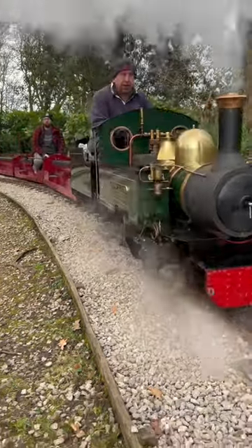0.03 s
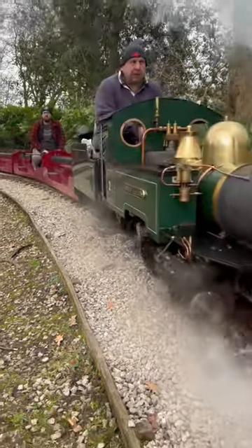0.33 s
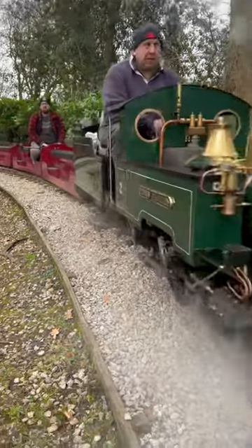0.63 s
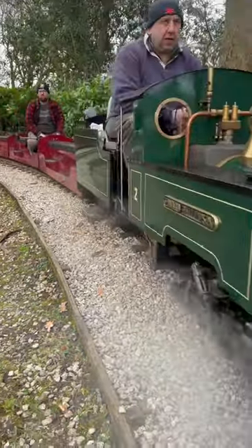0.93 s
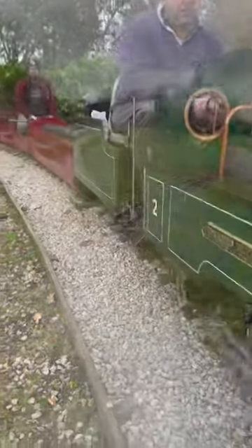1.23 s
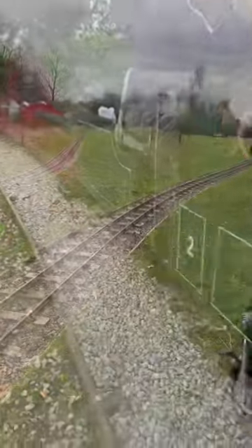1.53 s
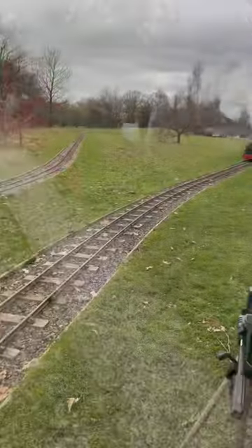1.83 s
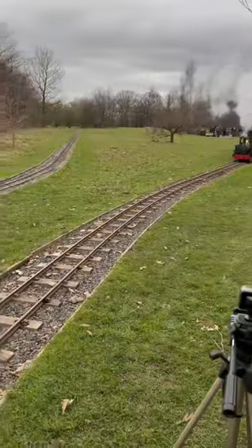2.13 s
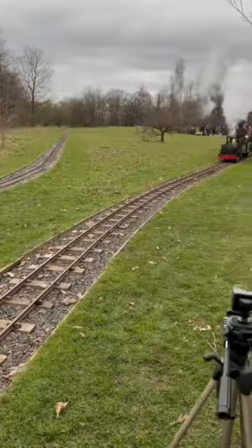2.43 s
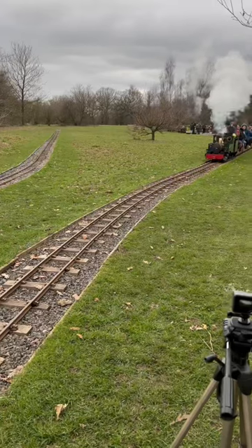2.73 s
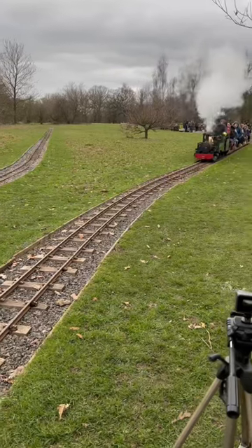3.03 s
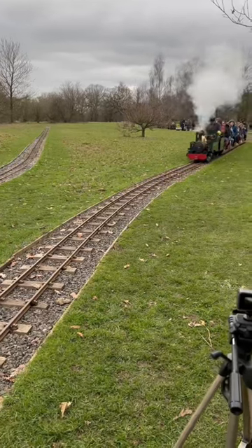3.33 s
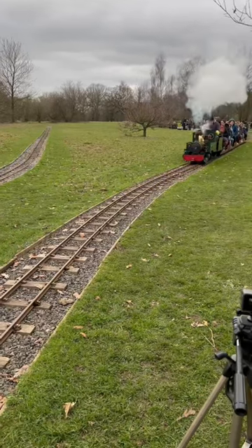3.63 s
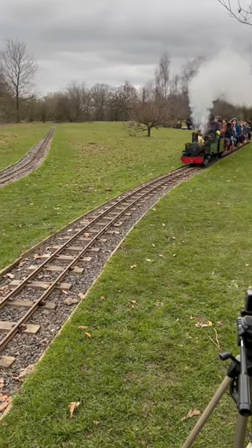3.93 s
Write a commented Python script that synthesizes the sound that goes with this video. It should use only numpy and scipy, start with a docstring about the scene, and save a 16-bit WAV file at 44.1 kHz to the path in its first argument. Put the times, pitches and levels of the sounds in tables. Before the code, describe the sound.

Small steam engine rumbling and hissing past, followed by rapid, regular chuffing in the distance.

```python
"""Soft hollow exhaust beats, rumbling wheels, clanking rods and hissing cylinders: a miniature steam
locomotive rolls past at arm's length. Each beat rings the chimney and pushes out a low thump of air.
This fades into the engine farther off across a field, working hard at twice the pace: four sharp
chuffs to each turn of the wheels, slowly drawing nearer, with a few soft gusts of wind."""
import sys
import numpy as np
from scipy import signal
from scipy.fft import rfft, irfft
from scipy.io import wavfile
from scipy.ndimage import uniform_filter1d

SR = 44100
rng = np.random.default_rng(int(sys.argv[2]) if len(sys.argv) > 2 else 0)


def to_wav(s):
    """Save 16-bit WAV."""
    ch = np.atleast_2d(s).T  # columns
    pcm = np.round(np.clip(ch, -1, 1) * 32767)  # PCM
    wavfile.write(sys.argv[1], SR, pcm.astype(np.int16))


N = 176400

# stereo images, treble and close pass: freq_hz, left_minus_right_db, coherence, left_lead_rad
TREBLE_IMAGE = [(7300,0,.7,-1.2),(8200,0,.96,0),(9200,0,.8,1.4),(9900,0,.99,2.9),(10700,0,.99,3.4),(11400,0,.8,5),(12400,0,.96,6.3),(13500,0,.8,7.6),(14400,0,.99,9.2),(15750,0,.99,9.7)]
NEAR_IMAGE = [(60,0,.99,0),(130,.3,.99,0),(250,1.6,.98,-.2),(480,2.4,.9,-.7),(690,.3,.87,-1.2),(1100,0,.8,-.5),(2000,-2,.85,.2),(2400,-4,.3,-1.5),(2850,-1,.75,-2.4),(3800,-4,.15,-2.2),(4600,-3.5,.55,-2.3),(5150,-5,.6,-4.3),(5800,0,.98,-3.3),(6300,0,.98,-3)] + TREBLE_IMAGE
# steam jet spectrum: freq_hz, level_db
STEAM_SPECTRUM = [(500,12),(1500,13),(2200,2),(2800,7.5),(3500,5.5),(4600,7),(5300,4.5),(6000,13),(7300,6),(8600,1.5),(9700,2),(10600,1),(12000,7.5),(13500,8),(14500,3),(15700,-8),(16200,-30)]


def near_exhaust():
    """Each beat rings the chimney; a low push of air follows."""
    # exhaust beats: start_s, note_db, thump_db
    beats = [(0.004,-16.5,-14),(0.117,-11.5,-10.5),(0.265,-18.5,-18),(0.42,-22,-33),(0.546,-19.5,-14),(0.666,-13.5,-13),(0.788,-10.5,-11.5),(0.939,-9,-17),(1.075,-17.5,-12),(1.194,-11.5,-12),(1.317,-19.5,-12.5),(1.462,-19.5,-16),(1.603,-17.5,-20)]
    # chimney and thump spectra: freq_hz, level_db
    note_spectrum = [(100,-32),(200,-7),(270,-6),(370,-29),(470,-13),(590,3),(648,9.5),(682,9.5),(745,-8),(1000,-12),(1300,-15.5),(2200,-25),(5000,-27.5),(15000,-60)]
    thump_spectrum = [(20,-34),(38,-32),(55,-5),(85,6),(125,-14.5),(200,-6),(400,-76)]
    note = steadied(turbulence(note_spectrum, NEAR_IMAGE, rough_db=6), window_s=0.0063)
    note *= puffs([(s, db) for s, db, _ in beats], attack_s=0.0036, hold_s=0.01, t60_s=0.29, accent=0.62)
    thump = steadied(turbulence(thump_spectrum, NEAR_IMAGE), window_s=0.075)
    thump *= puffs([(s, db) for s, _, db in beats],
                   delay_s=0.0028, attack_s=0.0087, hold_s=0.042, t60_s=0.15)
    return from_db(-6.5) * note + from_db(-13) * thump


def far_engine():
    """Each chuff is a hollow blast, hiss, bark and thump; the chimney's ring grows as the engine nears."""
    # chuffs: start_s, level_db
    beats = [(1.693, -25.5), (1.7574, -28), (1.8244, -29.5), (1.905, -25.5), (1.9804, -22.5),
             (2.046, -23.5), (2.1156, -25.5), (2.1933, -24.5), (2.2654, -23), (2.3314, -22.5), (2.399, -26),
             (2.482, -23), (2.5526, -23), (2.6184, -22.5), (2.682, -23.5), (2.7634, -23), (2.8358, -21.5),
             (2.9027, -21.5), (2.9667, -23), (3.0458, -22), (3.1208, -20), (3.1864, -22), (3.252, -23),
             (3.3277, -21.5), (3.4007, -21), (3.4656, -21.5), (3.53, -23.5), (3.6078, -21), (3.681, -21.5),
             (3.7435, -21.5), (3.8064, -21.5), (3.8844, -22), (3.957, -20)]
    # spectra of the chuff's parts and the train's drone: freq_hz, level_db
    blast_spectrum = [(600,-19),(1000,-2),(1150,-4),(1230,-15),(1470,-1.5),(1690,-6.5),(1880,2.5),(2400,1),(2900,0.5),(3250,-3),(3550,-16),(4250,-12.5),(4650,-3.5),(5100,-10),(6200,-44),(9000,-35)]
    hiss_spectrum = [(1500,-29),(2800,4),(4500,-0.5),(5500,3),(6600,5.5),(7800,-3),(9200,-3),(11200,-5),(13500,-6),(15600,-9),(16200,-33)]
    ring_spectrum = [(650,-34),(780,0),(880,-9),(1050,-14),(1250,-11),(1380,-2.5),(1465,4.5),(1560,-6.5),(1900,-3),(2600,-25),(3150,-33),(3550,-4.5),(3850,-9),(4250,-8.5),(4700,-33),(6000,-28)]
    bark_spectrum = [(130,-21),(210,4.5),(290,0),(380,-5.5),(490,-0.5),(580,-4),(660,10),(790,6),(900,-3.5),(1060,-10),(1400,-45),(3000,-56)]
    thump_spectrum = [(25,-25),(60,2),(100,8),(125,4),(165,-4.5),(205,2.5),(260,-39.5),(500,-50)]
    drone_spectrum = [(20,-28),(45,-42),(85,-3.5),(120,-5),(160,-9),(205,2),(270,-20),(480,-9.5),(700,-17),(1100,-22),(2200,-27.5),(5000,-41),(9000,-45),(15000,-66)]
    # swell of chimney ring and drone: time_s, level_db
    ring_swell = [(1.7,-26),(2.6,-15.5),(3.1,-15),(3.5,-11.5),(4,-12)]
    drone_swell = [(0,-72),(1.2,-57),(1.7,-32.5),(2.2,-35.5),(3,-36),(4,-31.5)]
    # distant stereo image: freq_hz, left_minus_right_db, coherence, left_lead_rad
    image = [(60,1.5,.65,0),(130,1.5,.82,0),(250,2,.88,-.2),(700,3.3,.97,-1.1),(1300,-2,.85,-1.2),(1600,-6,.88,-.1),(2050,-5,.85,0),(2450,-5.5,.8,2.3),(2900,-6,.83,1.4),(3500,-3.5,.82,1),(4300,-6,.6,-1.4),(5100,-8,.68,-4.2),(5700,0,.98,-3.3),(6400,0,.98,-3)] + TREBLE_IMAGE
    blast = flicker(turbulence(blast_spectrum, image, rough_db=1.8), depth_db=2)
    blast = steadied(blast, window_s=0.029)
    blast *= puffs(beats, delay_s=-0.003, attack_s=0.007, hold_s=0.011, t60_s=0.2, accent=0.5)
    hiss = flicker(turbulence(hiss_spectrum, image, rough_db=-1), depth_db=3)
    hiss *= puffs(beats, delay_s=-0.0022, attack_s=0.0062, hold_s=0.013, t60_s=0.21)
    ring = steadied(turbulence(ring_spectrum, image), window_s=0.014)
    ring *= puffs(beats, delay_s=-0.0037, attack_s=0.0052, hold_s=0.024, t60_s=0.18, accent=1.85)
    ring *= gain_curve(ring_swell)
    bark = steadied(turbulence(bark_spectrum, image, rough_db=3), window_s=0.02)
    bark *= puffs(beats, delay_s=-0.0022, attack_s=0.015, hold_s=0.014, t60_s=0.2, accent=0.82)
    thump = steadied(turbulence(thump_spectrum, image), window_s=0.027)
    thump *= puffs(beats, delay_s=0.001, attack_s=0.0077, hold_s=0.022, t60_s=0.48, accent=0.95)
    drone = gain_curve(drone_swell) * steadied(turbulence(drone_spectrum, image), window_s=0.032)
    echoing = field_echoes(early_echoes(from_db(-10.5) * blast + from_db(-16) * hiss))
    return echoing + ring + from_db(-7.5) * bark + from_db(-8) * thump + drone


def wheels():
    """Wheels rumble on the rails close by."""
    # rolling level: time_s, level_db
    rolling = [(0,-26),(.38,-22),(.5,-22),(.64,-23.5),(.85,-22.5),(1.0,-19.5),(1.12,-21.5),(1.18,-23),(1.28,-27),(1.38,-22.5),(1.5,-24.5),(1.75,-33),(2.0,-44),(2.2,-91.5)]
    # rumble spectrum: freq_hz, level_db
    spectrum = [(20,-42),(50,-1.5),(85,4),(130,0.5),(180,2.5),(255,3),(330,-3.5),(390,-3),(470,-0.5),(570,-2.5),(670,0),(780,-5),(1000,-11),(1400,-22.5),(2500,-28),(6000,-57)]
    gain = gain_curve(rolling) * from_db(-0.5 + 0.13 * drift(6))
    return gain * flicker(turbulence(spectrum, NEAR_IMAGE, rough_db=-0.5), depth_db=2)


def rods():
    """Rods and couplings knock, each blow with a crack at its own pitch."""
    # blows: start_s, knock_db, knock_t60_s, crack_db, crack_hz
    clanks = [(0.123,-27,0.075,-30,1600),(.222,-26,0.1,-25.5,1680),(.262,-26,0.03,-32,3600),(.400,-20,0.25,-32,1900),(.430,-24,0.061,-22,1640),(.466,-30,.06,-34,3100),(0.567,-21,0.1,-38,1700),(.670,-23,0.16,-37,1500),
              (0.934,-18.5,.1,-28,1610),(0.966,-19,0.034,-22.5,2450),(.980,-27,0.073,-37,3200),(1.078,-22,.12,-32,1700),(1.104,-24,0.088,-39,2700),(1.197,-23,0.17,-41,1700),(1.393,-22,0.12,-25,1410),(1.455,-20.5,0.47,-36,4100),(1.485,-21,0.067,-22,2870)]
    # knock and crack spectra: freq_hz, level_db
    knock_spectrum = [(200,2),(700,7.5),(1250,11),(1700,5.5),(2200,-9),(2700,4.5),(4000,-10),(6000,-9),(14000,-48)]
    crack_spectrum = [(800,11.5),(1600,-1.5),(2700,3),(3700,1.5),(4600,-1),(6500,-5),(12000,-30)]
    width_octaves = 0.61
    knock_noise = steadied(turbulence(knock_spectrum, NEAR_IMAGE, rough_db=5), window_s=0.0055)
    crack_noise = turbulence(crack_spectrum, NEAR_IMAGE)
    knocks = cracks = 0
    for start_s, knock_db, t60_s, crack_db, crack_hz in clanks:
        blow = puffs([(start_s, knock_db)], delay_s=-0.0025, attack_s=0.0016, hold_s=0.0092, t60_s=t60_s)
        knocks += blow * knock_noise
        edges_hz = crack_hz * 2 ** (np.array([-0.5, 0.5]) * width_octaves)
        band = signal.butter(1, edges_hz, "band", fs=SR, output="sos")
        crack = steadied(signal.sosfilt(band, crack_noise), window_s=0.002)
        cracks += crack * puffs([(start_s, crack_db)], attack_s=0.0012, hold_s=0.0013, t60_s=0.044)
    return from_db(-9.5) * knocks + cracks


def cylinder_steam():
    """Wet steam hisses from the cylinders and spits more at strong flow."""
    # steam flow: time_s, level_db
    flow = [(0,-36),(.05,-36.5),(.11,-41),(.19,-41),(.24,-42),(.39,-43.5),(.45,-35),(.6,-36.5),(.7,-39.5),(.76,-43.5),(.92,-39),(.98,-33),(1.1,-34.5),(1.17,-38.5),(1.32,-42),(1.5,-40.5),(1.79,-49.5)]
    # spit spectrum: freq_hz, level_db
    spit_spectrum = [(500,-33),(1300,-14),(2000,7),(2750,11),(3300,9),(4600,7.5),(5400,-14),(7000,-24)]
    flow_db, = curves(flow)
    fade, = curves([(1.76, 0.99), (1.95, 0.46)])  # time_s, gain
    hiss = flicker(turbulence(STEAM_SPECTRUM, NEAR_IMAGE, rough_db=0.4), depth_db=4, span_frames=5)
    hiss *= from_db(flow_db + 4 + 0.5 * drift(25))
    spit = from_db(1.155 * flow_db + 3) * turbulence(spit_spectrum, NEAR_IMAGE, rough_db=-0.5)
    return fade * (hiss + spit)


def jet_whistle():
    """The steam jet whistles thinly, twice: a gliding narrow band of noise."""
    # whistle: time_s, pitch_hz, level_db
    glide = [(.4,5080,-52),(.46,4890,-39),(.52,4660,-38),(.62,4480,-41.5),(.72,4310,-47),(.8,4300,-60),(.92,4440,-66),(.98,4520,-45),(1.12,4700,-41),(1.3,4720,-85)]
    width_hz = 170
    pitch_hz, level_db = curves(glide)
    phase = 2 * np.pi * np.cumsum(pitch_hz) / SR
    ears = np.array([drift(width_hz) * np.cos(phase) + drift(width_hz) * np.sin(phase) for _ in range(2)])
    return from_db(level_db) * steadied(ears, window_s=0.018) * from_db([[-3], [0]])


def jet_sizzle():
    """A high sizzle of the steam jet peaks as the first whistle ends."""
    # sizzle level: time_s, level_db
    swell = [(.41,-75),(.46,-36),(.52,-42),(.66,-40),(.70,-36),(.745,-31),(.765,-40),(.79,-80)]
    # sizzle spectrum: freq_hz, level_db
    spectrum = [(8500,-25),(10200,-6),(11300,16),(12200,-5),(13000,13),(14200,-4),(16000,-20)]
    return gain_curve(swell) * turbulence(spectrum, NEAR_IMAGE)


def water_spurts():
    """Drops of water burst through the steam jet."""
    # drops: start_s, level_db
    drops = [(.262,-34.5),(.97,-30),(1.0,-42)]
    envelope = puffs(drops, delay_s=-0.0011, attack_s=0.0018, hold_s=0.005, t60_s=0.049)
    return envelope * turbulence(STEAM_SPECTRUM, NEAR_IMAGE)


def body_booms():
    """After the hardest knocks the engine's body booms on a wavering low note."""
    # booms: start_s, level_db, pitch_hz
    booms = [(.468,-26,174.3),(.51,-24.5,226),(.98,-25,249)]
    time_s = np.arange(N) / SR
    out = np.zeros(N)
    for start_s, level_db, pitch_hz in booms:
        tone = np.sqrt(2) * np.sin(2 * np.pi * pitch_hz * time_s + 0.32 * drift(25))
        out += tone * puffs([(start_s, level_db)], attack_s=0.0082, hold_s=0.018, t60_s=0.12)
    return out


def rail_ring():
    """The rail rings on behind the engine in two wavering tones."""
    # rail tones: pitch_hz, level_db
    tones = [(476,-1.5),(530,-6)]
    # ring level: time_s, level_db
    swell = [(0,-42),(1.2,-49),(1.55,-34),(1.8,-36),(2.1,-67),(2.3,-84)]
    ring = np.zeros(N)
    for pitch_hz, level_db in tones:
        phase = 2 * np.pi * pitch_hz * np.arange(N) / SR
        ring += from_db(level_db) * (drift(1.9) * np.cos(phase) + drift(12.5) * np.sin(phase))
    return gain_curve(swell) * ring


def wind():
    """Soft low gusts buffet the listening point in the open field."""
    # gusts: start_s, level_db
    gusts = [(2.36,-34),(3.19,-25.5),(3.42,-23.5)]
    # buffet spectrum: freq_hz, level_db
    spectrum = [(20,-23),(35,-16),(70,13),(110,-5),(200,-10),(400,-55)]
    # stereo image: freq_hz, left_minus_right_db, coherence, left_lead_rad
    image = [(20,2,.5,0),(400,2,.5,0)]
    envelope = puffs(gusts, delay_s=-0.0076, attack_s=0.023, hold_s=0.019, t60_s=0.14)
    return envelope * turbulence(spectrum, image)


def early_echoes(x):
    """Dull echoes off nearby surfaces make the sound hollow."""
    # reflections: delay_s, gain
    echoes = [(.0062,.4),(.0021,.08)]
    cutoff_hz = 4200
    hz = np.arange(N // 2 + 1) * SR / N
    reflected = sum(gain * np.exp(-2j * np.pi * hz * delay_s) for delay_s, gain in echoes)
    return irfft(rfft(x) * (1 + reflected / np.hypot(1, (hz / cutoff_hz) ** 2)), N)


def field_echoes(x):
    """Faint returns from across the field trail into the gaps between chuffs."""
    # returns: delay_s, gain
    echoes = [(.031,0.086),(.047,0.066),(.089,.1)]
    samples = np.arange(N)
    return x + sum(gain * np.array([np.interp(samples - delay_s * SR, samples, ear, left=0) for ear in x])
                   for delay_s, gain in echoes)


def turbulence(spectrum, image, rough_db=0):
    """Sputtering stereo noise with the given spectrum and image; rms 1."""
    hz = np.arange(N // 2 + 1) * SR / N
    white = rng.standard_normal((2, N)) * from_db(rough_db * drift(174))
    common, apart = rfft(white)
    points_hz, levels_db = np.transpose(spectrum)
    colour = from_db(np.interp(np.log(hz + 1), np.log(points_hz), levels_db)) * hz / (hz + 10)
    image_hz, *columns = np.transpose(image)
    pan_db, coherence, lead_rad = [np.interp(hz, image_hz, column) for column in columns]
    ears = []
    for side in (1, -1):
        blend = np.sqrt(1 + coherence) * common + side * np.sqrt(1 - coherence) * apart
        pan = from_db(side * pan_db / 2) / np.sqrt(np.cosh(pan_db * np.log(10) / 20))  # constant power
        ears.append(colour * blend * pan * np.exp(side * 0.5j * lead_rad))
    return unit_rms(irfft(ears, N))


def puffs(beats, attack_s, hold_s, t60_s, delay_s=0, accent=1):
    """Envelope of beats that open, hold and die; accent scales their spread in dB."""
    power = np.zeros(N)
    mean_db = np.mean([db for _, db in beats])
    for start_s, db in beats:
        age_s = np.arange(N) / SR - start_s - delay_s
        rise = np.clip(age_s / attack_s, 0, 1)
        decay_db = -60 * np.maximum(age_s - attack_s - hold_s, 0) / t60_s
        power += (rise * from_db(mean_db + accent * (db - mean_db) + decay_db)) ** 2
    return np.sqrt(power)


def flicker(x, depth_db, span_frames=10):
    """Narrow patches of the spectrum swell and sink at random; rms 1."""
    frames = signal.stft(x, nperseg=1024)[2]
    patches = uniform_filter1d(rng.standard_normal(frames.shape[1:]), size=4, axis=0)
    patches = unit_rms(uniform_filter1d(patches, size=span_frames, axis=1))
    return unit_rms(signal.istft(frames * from_db(depth_db * patches))[1][:, :N])


def steadied(x, window_s):
    """Noise levelled to rms 1, so each beat gets its set strength."""
    width = int(window_s * SR)
    power = np.mean(x ** 2, axis=0)
    smoothed = uniform_filter1d(uniform_filter1d(power, width), width)
    return x / np.sqrt(np.maximum(smoothed, 1e-6))


def drift(rate_hz):
    """Smooth random motion; rms 1."""
    hop, settle_steps = 40, 2000
    pole = np.exp(-2 * np.pi * rate_hz * hop / SR)
    white = rng.standard_normal(N // hop + settle_steps + 2)
    slow = signal.lfilter([1], [1, -2 * pole, pole * pole], white)[settle_steps:]
    return np.interp(np.arange(N) / hop, np.arange(len(slow)), unit_rms(slow))


def curves(rows):
    """Each column after time_s, at every sample."""
    time_s, *columns = np.transpose(rows)
    return [np.interp(np.arange(N) / SR, time_s, column) for column in columns]


def gain_curve(rows):
    """Gain at every sample from rows of time_s, level_db."""
    return from_db(curves(rows)[0])


def from_db(db):
    return 10 ** (np.asarray(db) / 20)


def unit_rms(x):
    return x / np.sqrt(np.mean(x ** 2) + 1e-20)


def scene():
    """The close pass fades into the distant run."""
    engine = near_exhaust() + wheels() + rods() + body_booms()
    steam = cylinder_steam() + jet_whistle() + jet_sizzle() + water_spurts()
    return engine + steam + far_engine() + rail_ring() + wind()


def record(dry):
    """Steep low-pass on the top treble."""
    stopband_hz = 16300
    return signal.sosfilt(signal.cheby2(18, 80, stopband_hz, fs=SR, output="sos"), dry)


dry = scene()
out = record(dry)
to_wav(out)
```